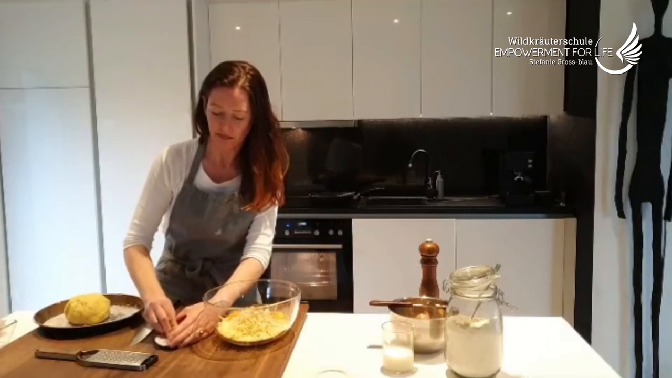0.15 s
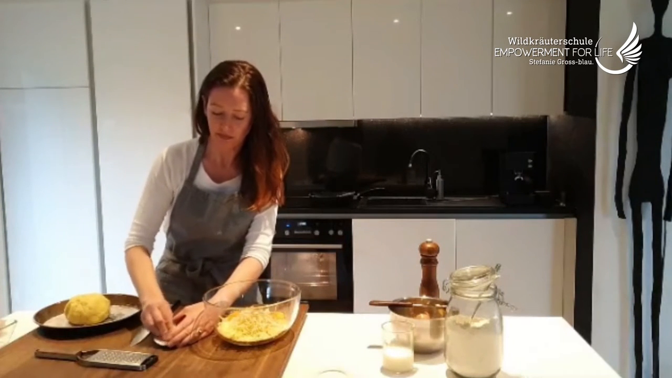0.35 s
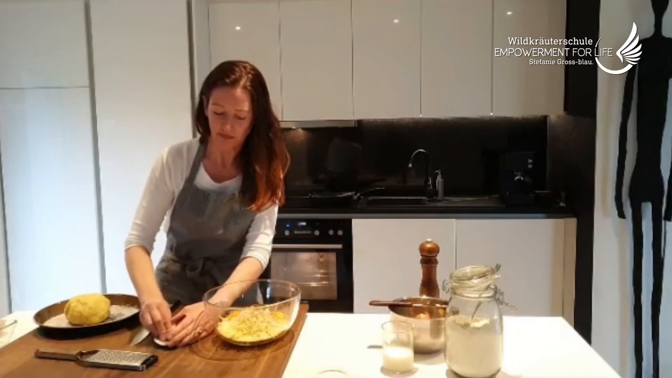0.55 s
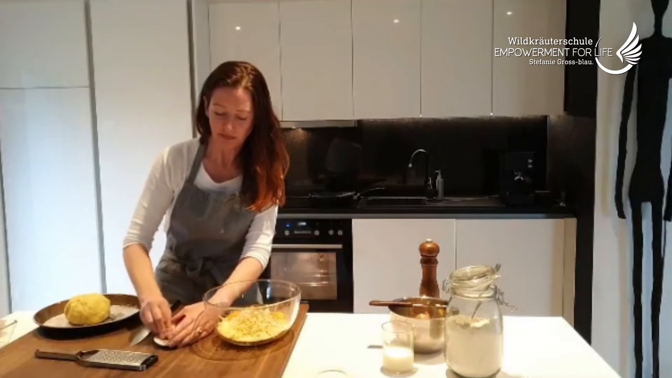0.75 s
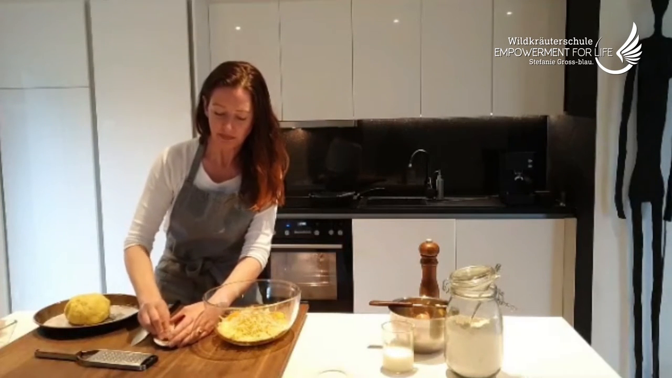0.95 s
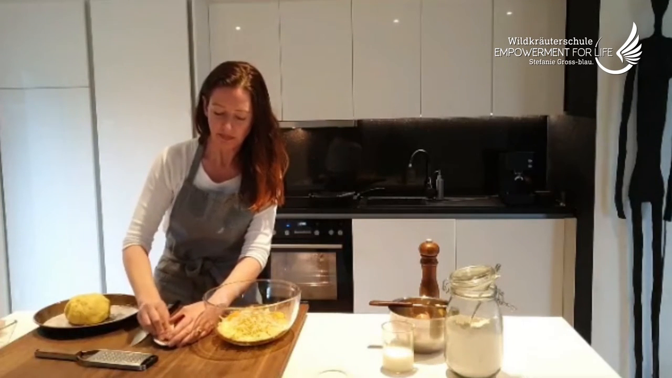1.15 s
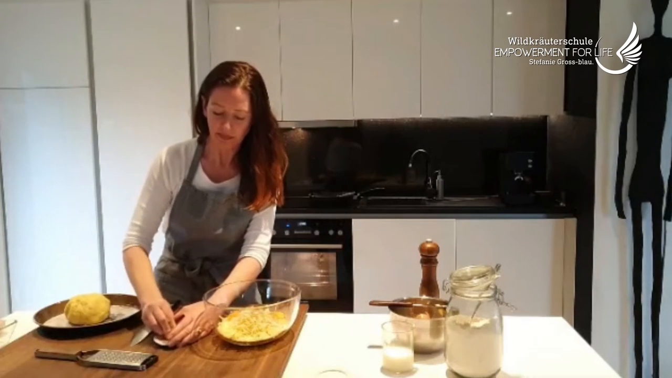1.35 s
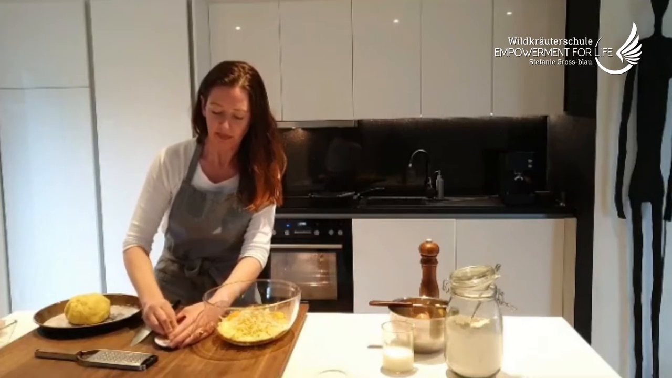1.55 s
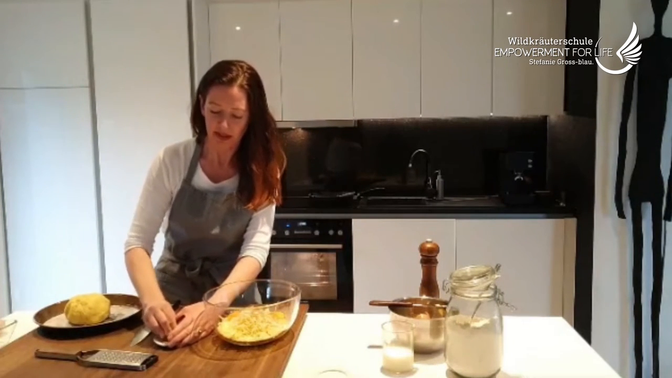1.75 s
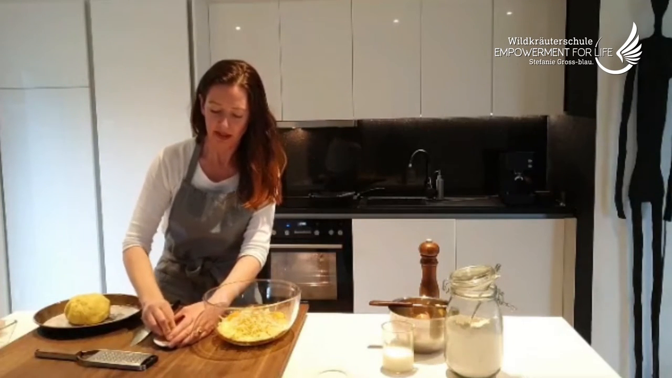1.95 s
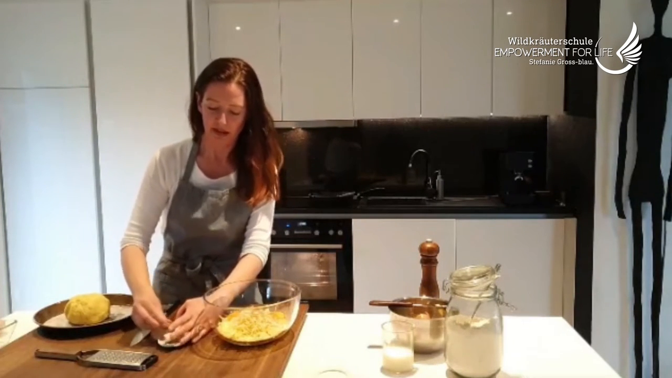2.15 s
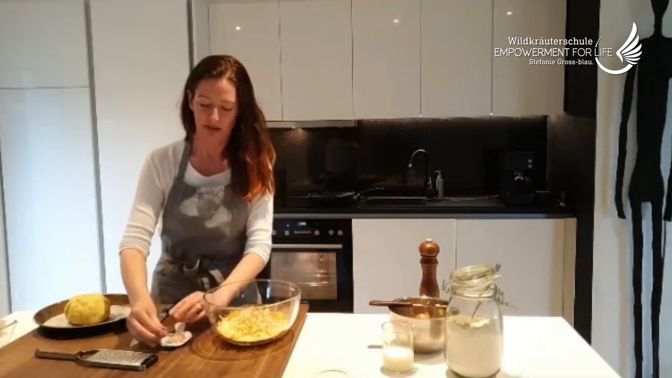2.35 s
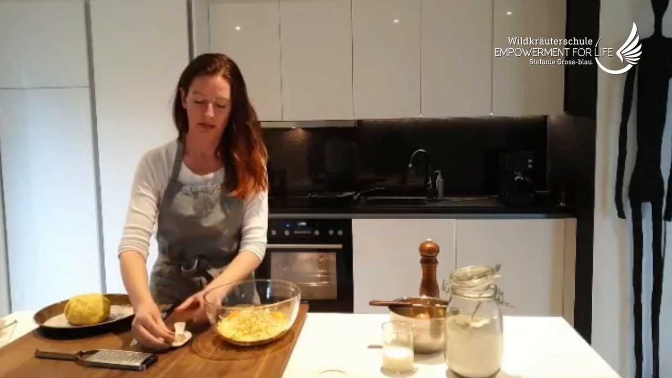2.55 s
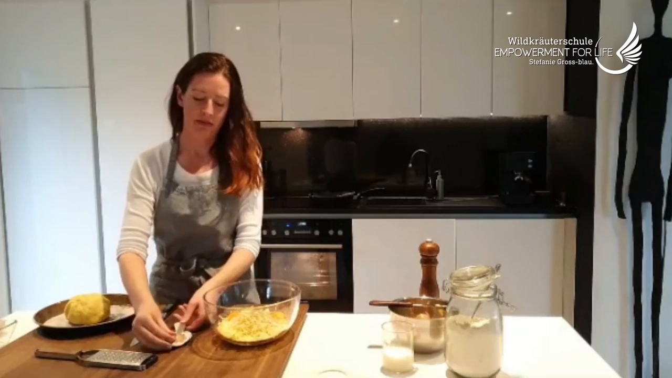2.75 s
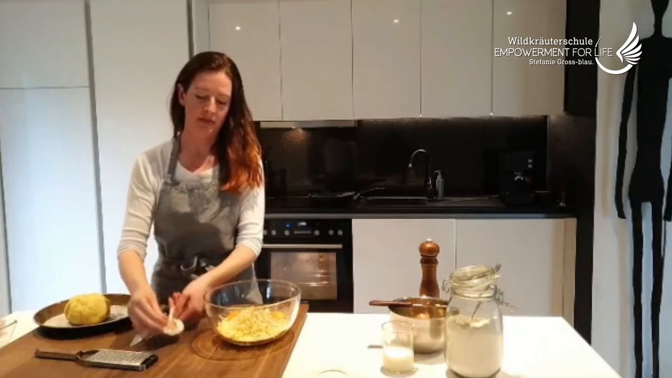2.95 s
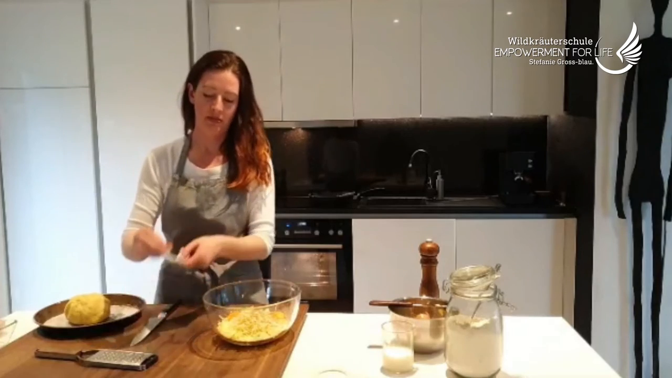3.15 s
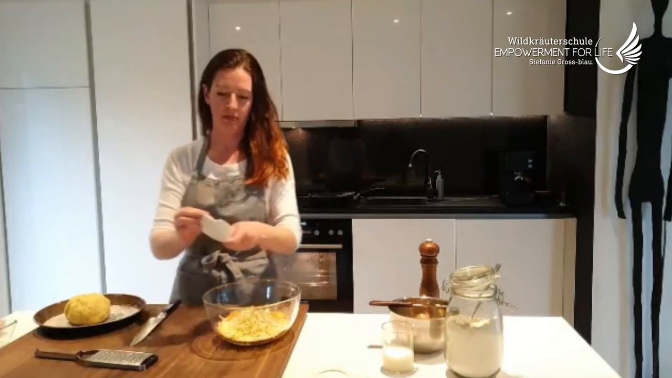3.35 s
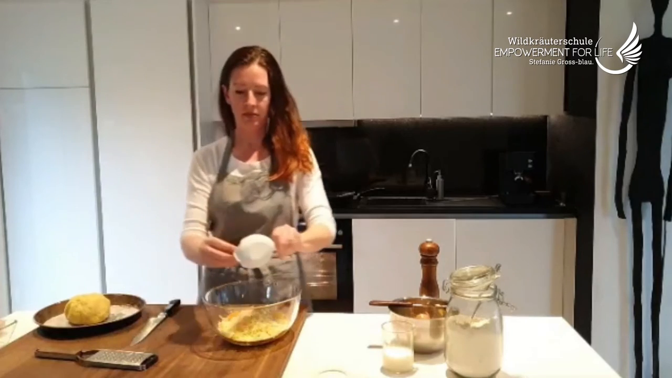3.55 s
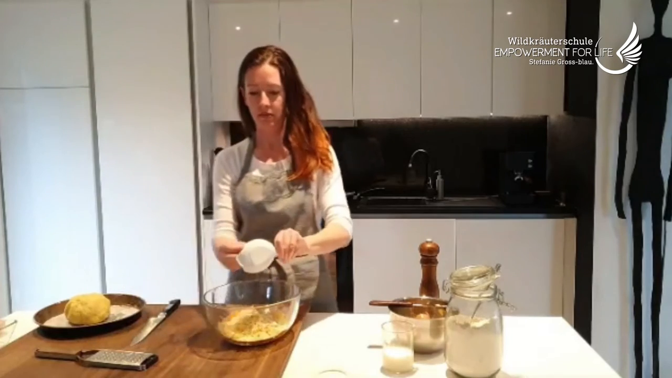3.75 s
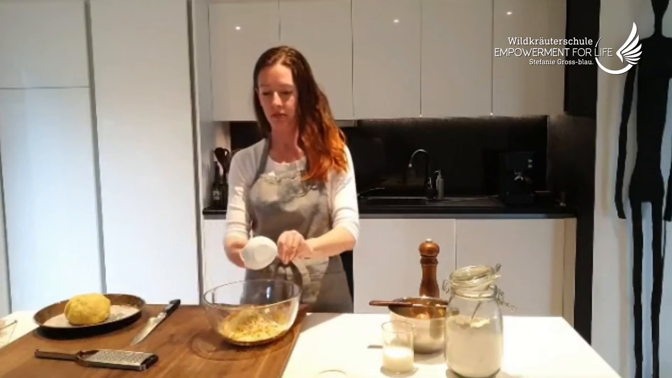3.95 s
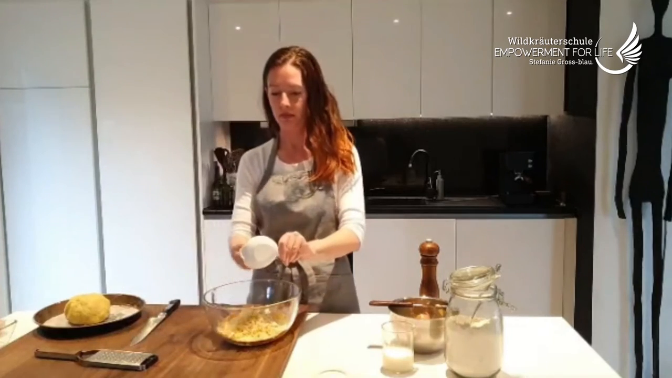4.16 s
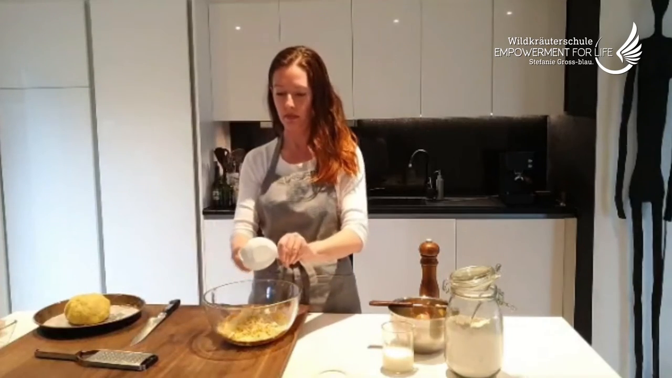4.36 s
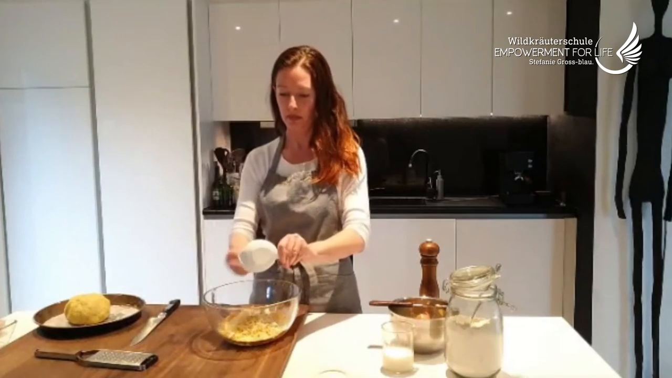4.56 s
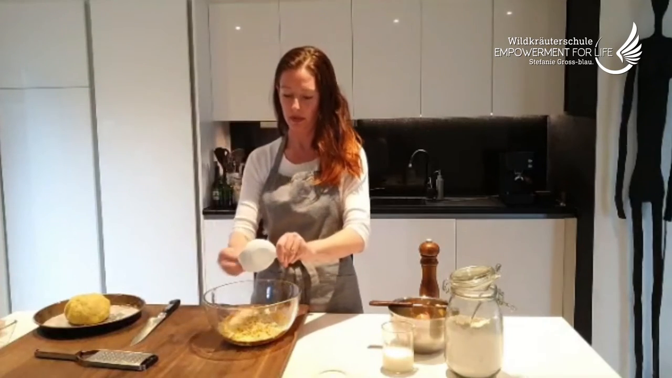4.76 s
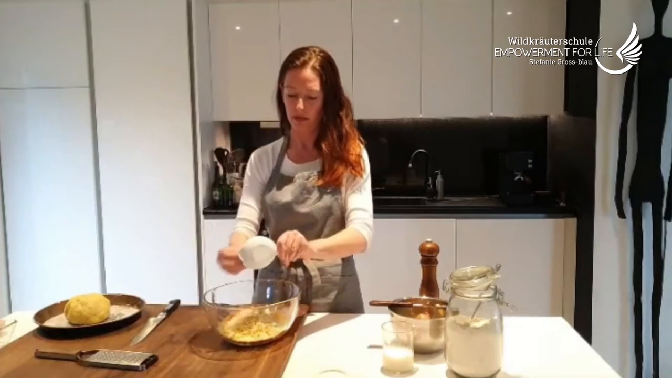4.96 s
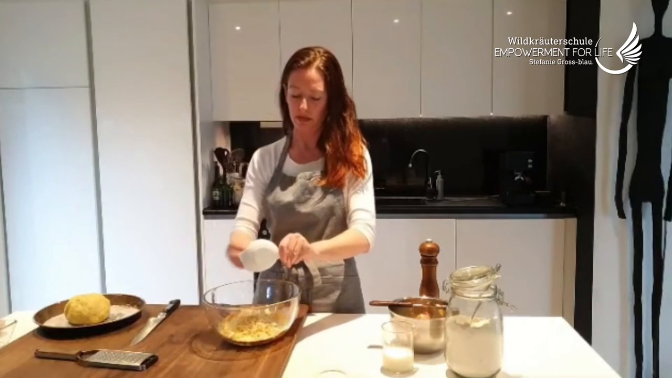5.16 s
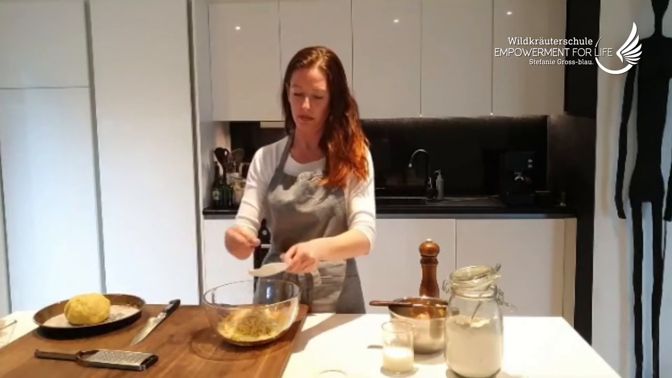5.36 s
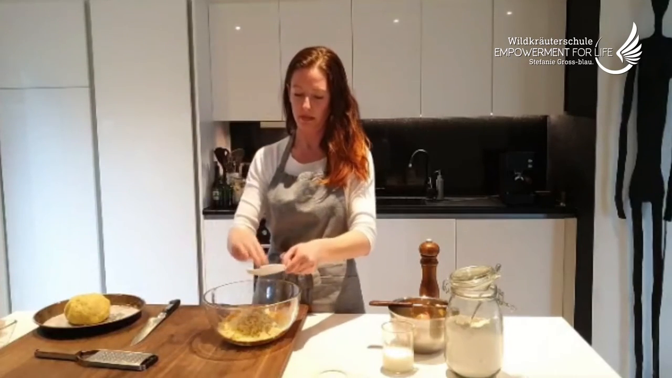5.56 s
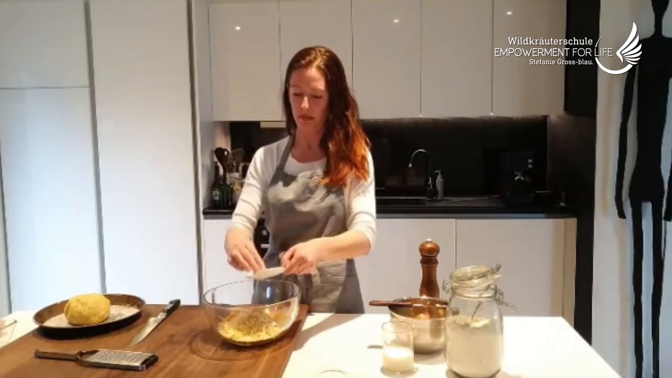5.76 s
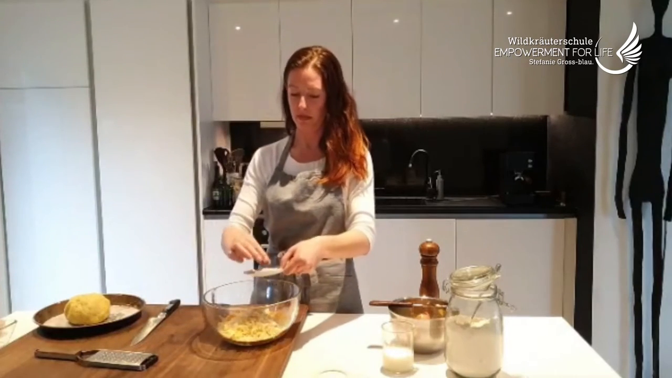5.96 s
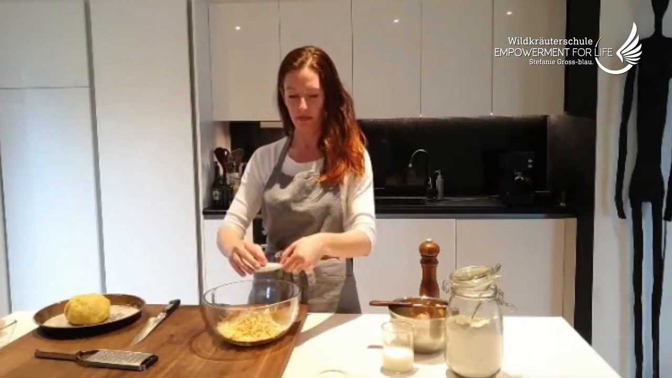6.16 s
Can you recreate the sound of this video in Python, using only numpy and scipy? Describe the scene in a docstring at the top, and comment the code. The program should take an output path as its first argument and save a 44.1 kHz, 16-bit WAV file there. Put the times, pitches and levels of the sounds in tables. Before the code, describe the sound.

A nutmeg is rasped quickly to and fro on a small metal grater pressed against a wooden board, with hollow knocks and crunches. The grater clatters as it is picked up. After a short pause the rasping resumes in the hand, lighter and brighter with a high metallic ring, and a few light taps follow. Hard kitchen walls echo the work, and an appliance hums low underneath.

```python
"""Grating nutmeg in a kitchen

A nutmeg is rasped to and fro on a small grater, about ten strokes a second, each a run of tiny snaps.
First the grater is pressed on a wooden board, which booms; it clatters as it is picked up.
Then it is rasped in the hand, where it rings freely, and tapped clean over a bowl.
Hard kitchen walls echo the work, and an appliance hums."""
import sys
import numpy as np
from scipy import signal
from scipy.fft import rfft, irfft, next_fast_len
from scipy.io import wavfile
from scipy.ndimage import uniform_filter1d

SR = 44100
rng = np.random.default_rng(int(sys.argv[2]) if len(sys.argv) > 2 else 0)


def store_pcm(level_fs):
    """Save levels as 16-bit WAV."""
    pcm = np.round(np.clip(level_fs, -1, 1) * 32767).astype(np.int16)
    wavfile.write(sys.argv[1], SR, np.atleast_2d(pcm).T)


N = 273949

# tone of the grater on the board and in the hand: (frequency [Hz], level [dB])
BOARD_COLOUR = [(28, -26), (45, 2), (70, -1), (140, 3.5), (200, 1.5), (360, -1), (430, -16), (560, 1.5),
                (780, -6), (1050, 3.5), (1800, -4), (2800, -7.5), (4000, -19), (6500, -33), (10000, -27.5),
                (11500, -63), (13000, -88)]
HAND_COLOUR = [(90, -12), (180, -13.5), (280, -3.5), (430, -14.5), (620, -10), (1100, -6.5), (1500, 2.5),
               (2100, -1), (2800, -4.5), (4000, -4.5), (5600, -18), (6600, -15), (9800, -13), (12000, -74)]
# the resonances of each: (frequency [Hz], width [Hz], height above the colour [dB])
BOARD_MODES = [(499, 10, 13), (583.7, 24, 13.2), (607, 26, 10), (688, 29, 12.5), (904, 47, 11.3),
               (1033, 23, 5.7), (1140, 11, 1), (1282, 52, 6.6), (1364, 32, 9), (1566, 150, 8.9),
               (1897, 96, 10.6), (2200, 140, 7.3), (3155, 35, 6.2)]
HAND_MODES = [(613, 90, 7.4), (1545, 130, 2.3), (2592, 46, 11.4), (2760, 430, 10.4), (2830, 18, 14.7),
              (2910, 44, 8), (3150, 85, 7.4), (3690, 22, 4), (4100, 280, 1.8), (5140, 170, 6.8)]
# the grater's high ring and topmost sparkle: (frequency [Hz], width [Hz], level [dB])
RING_MODES = [(8482, 32, 0), (8690, 260, -11), (9620, 220, -20)]
SPARKLE_MODES = [(13775, 42, 0), (14420, 120, -14)]


def board_strokes(boom_hz=600, pressure_shift=.013):
    """Rasping on the board: the hand's pressure retunes the booming wood from stroke to stroke."""
    # (start [s], rise [s], level [dB], boom [dB], brightness [dB/octave])
    strokes = [ (0.0, 0.00073, -16, -4.5, 0.7), (.045, 0.03, -16, -3.5, 0.5),
               (.26, 0.012, -22.5, 2.5, -1.5), (.352, 0.036, -14.5, -1.5, -0.4), (.458, 0.043, -13, 1, 1),
               (.562, 0.04, -15.5, -3.5, 0.4), (.658, 0.021, -14, -0.5, -0.5), (.765, 0.029, -12, 2.5, 0.5),
               (.852, 0.038, -14, 2, 0.5), (.968, 0.027, -12, -5.5, 0), (1.062, .036, -13, -1.5, 0.5),
               (1.166, 0.037, -11, -0.5, -0.5), (1.26, .04, -14.5, 2, 0.5), (1.378, 0.033, -14.5, 1, 0.2),
               (1.475, .023, -15.5, 2, -0.1), (1.765, .018, -16, 5, -0.7), (1.87, 0.028, -14.5, -3, -0.5),
               (1.976, 0.015, -18.5, -7.5, -1.5)]
    # pull, then push: (length [s], ring against the stroke [dB])
    turns = [(.057, -36), (.052, -27.5)]
    out, ringing = np.zeros(N), ring(RING_MODES, damping_hz=464)
    for k, (s, rise, db, boom_db, bright_db) in enumerate(strokes):
        length, ring_db = turns[k % 2]
        push = swing(rise, length, swell=.62, fade=1.19)
        lumpy_push = catching(push, depth_db=2, grip_s=.011)
        force = scrape(lumpy_push, teeth_per_s=900, spread_db=1.5, powder_db=-6.5)
        shift = 1 + pressure_shift * rng.uniform(-.9, 1)
        pressed = body(BOARD_COLOUR, [(hz * shift, width, peak) for hz, width, peak in BOARD_MODES])
        booming = lift(pressed, boom_db, boom_hz, octaves=.19)
        rasp = bite(force, booming, bright_db) + amp(ring_db) * bite(force, ringing, 0)
        add(out, s, amp(db) * np.linalg.norm(push) * rasp)
    return out


def hand_strokes(hurry_per_s=.3, touch_shift=.025, touch_db=4, plate_hz=2760):
    """Rasping in the hand: each stroke meets another spot of the plate, bending and favouring modes."""
    # (start [s], rise [s], level [dB], brightness [dB/octave], lift of the main resonance [dB])
    strokes = [ (3.874, 0.033, -27, -0.1, 4), (3.975, 0.013, -33, -0.5, -1), (4.045, 0.0071, -29, 2.5, 0),
               (4.117, 0.023, -26.5, -1.5, 5.5), (4.232, 0.016, -25.5, -0.7, 6),
               (4.298, 0.02, -30, -2.5, 5), (4.391, 0.021, -24, -1.5, 0), (4.47, .025, -29.5, -2, 4),
               (4.565, 0.012, -25, -1, -3), (4.644, 0.012, -22, -0.2, 1), (4.742, 0.02, -27, -2.5, -3),
               (4.818, .018, -27.5, -1.5, -2), (4.906, 0.0082, -23.5, -1.5, -1),
               (4.992, 0.025, -25, 0.7, -4), (5.089, 0.0077, -22.5, -1.9, -4.5), (5.172, 0.017, -28, 2, -2),
               (5.253, 0.011, -29.5, -1.7, 7)]
    # pull, then push, before hurry shortens them: (length [s])
    turns = [.05, .06]
    out = np.zeros(N)
    for k, (s, rise, db, bright_db, plate_db) in enumerate(strokes):
        length = turns[k % 2] * np.exp(-hurry_per_s * (s - strokes[0][0]))
        push = swing(rise, length, swell=.56, fade=2.1)
        lumpy_push = catching(push, depth_db=3, grip_s=.008)
        force = scrape(lumpy_push, teeth_per_s=300, spread_db=2.6, powder_db=-13)
        shift = 1 + touch_shift * rng.uniform(-1.08, 1)
        modes = [(hz * shift, width, peak + touch_db * rng.uniform(-.8, 1))
                 for hz, width, peak in HAND_MODES]
        plate = lift(body(HAND_COLOUR, modes), plate_db, plate_hz, octaves=.18)
        add(out, s, amp(db) * np.linalg.norm(push) * bite(force, plate, bright_db))
    return out


def swing(rise, length, swell, fade):
    """The push of one stroke swells, then fades; swell and fade set the two curves."""
    t = np.arange(SR // 3) / SR
    attack = np.minimum(t / max(rise, .001), 1) ** swell
    return attack * np.exp(-(np.maximum(t - rise, 0) / max(length - rise, .004)) ** fade)


def catching(push, depth_db, grip_s):
    """The nut grips and slips at random, so a push comes in lumps."""
    t = np.arange(len(push)) / SR
    grip = np.interp(t / grip_s, np.arange(64), rng.uniform(-1, 1, 64))
    return push * amp(depth_db * grip)


def scrape(push, teeth_per_s, spread_db, powder_db, jitter=.35):
    """Force of the teeth chipping the nut: a loosely even run of uneven snaps over a fine hiss."""
    hiss = unit(rng.standard_normal(len(push)))
    gap, size, sign = rng.random((len(push) // 8, 3)).T
    teeth_passed = np.cumsum(teeth_per_s / SR * (.5 + .5 * push))  # a faster nut passes more teeth
    onsets = np.searchsorted(teeth_passed, np.cumsum(1 + 2 * jitter * (2 * gap - 1)))
    heights = amp(spread_db * np.minimum(-np.log(1 - size), 3)) * np.sign(sign - .5)
    snaps = np.bincount(onsets, heights, len(push))[:len(push)]
    return unit(push * (unit(snaps) + amp(powder_db) * hiss))


def bite(force, response, bright_db):
    """The force shakes a body; a sharper bite tilts it to the treble by bright_db an octave."""
    tilted = shape(force, lambda f: amp(bright_db * np.log2(np.clip(f, 400, 5500))))
    return unit(signal.fftconvolve(tilted, response)[:len(force) + SR // 5])


def drag(board, until_s=2.24, release_s=.23, db=-35.5):
    """The nut stays on the teeth between strokes, too lightly to wake much of the board's boom."""
    t = np.arange(round(until_s * SR)) / SR
    push = np.clip((until_s - t) / release_s, 0, 1)
    force = scrape(push, teeth_per_s=960, spread_db=-.5, powder_db=-2.5)
    rasp = bite(force, lift(board, db=-8.5, hz=600, octaves=.19), bright_db=3)
    out = np.zeros(N)
    add(out, 0, amp(db) * np.linalg.norm(push) * rasp)
    return out


def bumps():
    """The pressed grater bumps the board in mid-stroke with a hollow knock."""
    # (time [s], energy [dB])
    hits = [(.073, 9), (.598, 3.5), (.674, 13), (.89, 15), (1.097, 6), (1.503, 10.5), (1.812, 7.5)]
    # tone of a bump: (frequency [Hz], level [dB])
    colour = [(40, -18), (200, -14), (430, -18.5), (560, 0), (700, 1), (950, -9), (3000, -30.5),
              (8000, -54), (13000, -75.5)]
    # its hollow resonance: (frequency [Hz], width [Hz], height above the colour [dB])
    modes = [(585.3, 35, 27)]
    out, hollow = np.zeros(N), body(colour, modes)
    for s, db in hits:
        add(out, s, amp(db) * blow(hollow, corner_hz=2400, chatter_s=.012))
    return out


def crunches(board):
    """The nut digs in and a chip breaks off with a pitched crunch."""
    # (time [s], energy [dB], chatter [s], pitch [Hz])
    chips = [(.492, 17, 0.015, 1460), (.985, 9, .012, 1226), (1.193, 6, .006, 1500),
             (1.411, 10, .005, 1440), (1.773, 14.5, 0.019, 1556)]
    # a crunch favours the board's upper resonances: (frequency [Hz], gain [dB])
    emphasis = [(700, -9.5), (1100, -4.5), (2000, 12.5), (3300, -3.5), (6000, -10)]
    out, bright_board = np.zeros(N), equalise(board, emphasis)
    for s, db, chatter_s, hz in chips:
        pitched = lift(bright_board, db=18, hz=hz, octaves=.13)
        add(out, s, amp(db) * blow(pitched, corner_hz=9000, chatter_s=chatter_s))
    return out


def crumbs():
    """Crumbs snap off with tiny bright ticks."""
    # (time [s], energy [dB])
    ticks = [(.287, -30), (.682, -29.5), (.99, -34)]
    out, tick = np.zeros(N), body([(1500, -23), (5000, .5), (10000, -10), (15000, -8)], [])
    for s, db in ticks:
        add(out, s, amp(db) * tick)
    return out


def zings():
    """A tooth sets the held grater's ring and sparkle singing within a stroke."""
    # (time [s], drive [s], energy [dB], sparkle against the ring [dB])
    catches = [(3.887, .004, -14, -1), (3.975, 0.018, -6, -11), (4.051, 0.031, -1.5, -8),
               (4.143, 0.016, -5.5, -8), (4.235, .002, -10, -8), (4.244, .014, -2.5, -11),
               (4.31, 0.017, -11, -9), (4.407, .008, -5.5, 0), (4.495, 0.011, -16, 0),
               (4.57, 0.028, -10.5, -1), (4.662, 0.037, -2, -4), (4.748, 0.026, -4.5, 3),
               (4.83, 0.045, -2, -6), (4.91, 0.033, 3, -16), (5.011, .016, 6, -14), (5.092, 0.023, 0.5, -6),
               (5.194, .01, -3, -3), (5.254, 0.016, -8, -9)]
    out = np.zeros(N)
    for s, drive_s, db, sparkle_db in catches:
        ringing = zing(RING_MODES, drive_s, damping_hz=30, grit=.4)
        sparkle = zing(SPARKLE_MODES, drive_s, damping_hz=60, grit=.54)
        add(out, s, amp(db) * (ringing + amp(sparkle_db) * sparkle))
    return out


def zing(modes, drive_s, damping_hz, grit, rise_s=.0043):
    """Teeth pump the high modes for a moment; then the nut pressing on the plate mutes them."""
    t = np.arange(SR // 6) / SR
    drive = np.minimum(t / rise_s, 1) * np.exp(-(t / drive_s) ** 4)
    friction = unit(drive * rng.standard_normal(len(t)))
    pumping = unit(drive * np.sin(2 * np.pi * modes[0][0] * t))
    singing = unit(signal.fftconvolve(pumping, ring(modes, damping_hz)))
    scratch = unit(signal.fftconvolve(friction, ring(modes, damping_hz=220)))
    return unit(singing + grit * scratch)


def skids(grater):
    """The nut skids over the tooth tips with a bright scrape."""
    # (time [s], energy [dB])
    slips = [(4.328, -1), (5.178, -0.5)]
    out, tips = np.zeros(N), lift(grater, db=17.5, hz=4550, octaves=.33)
    push = swing(rise=.014, length=.027, swell=.8, fade=2.9)
    for s, db in slips:
        force = scrape(push, teeth_per_s=700, spread_db=4, powder_db=-13)
        add(out, s, amp(db) * bite(force, tips, 0))
    return out


def snags(grater):
    """A tooth snags on the nut and lets go with a click."""
    # (time [s], energy [dB])
    clicks = [(3.8945, -13), (3.913, -1), (3.978, -1), (4.0498, 0.5), (4.0695, -6), (4.1211, 3),
              (4.2328, -2.5), (4.246, -0.5), (4.31, 0.5), (4.408, -9), (4.433, -1.5), (4.569, -4.5),
              (4.653, -2), (4.664, -2), (4.7653, -1), (4.91, -2.5), (5.0895, -2), (5.108, -3),
              (5.2551, -1.5)]
    out = np.zeros(N)
    for s, db in clicks:
        add(out, s, amp(db) * blow(grater, corner_hz=8000, chatter_s=.0015))
    return out


def clatter(wood_hz=1450, halving_db=8.5):
    """The grater is tipped up, clacks down and rocks on the board until it is lifted."""
    # (time [s], energy [dB], treble corner [Hz], woody body [dB])
    knocks = [(2.232, 11.5, 3030, 2), (2.2375, 15, 4450, 7.5), (2.248, 10, 2200, 7), (2.256, 4.5, 2580, 6),
              (2.2856, 16.5, 3640, -4), (2.2955, 15, 898, -0.5), (2.318, 3.5, 2030, 1),
              (2.383, -3, 700, -5), (2.604, -7, 1100, -9), (2.7, -17, 600, 3), (2.872, -20, 400, -4.5),
              (2.95, -19.5, 330, 5), (2.972, -18, 330, -8.5)]
    # tone of the loose grater against the board: (frequency [Hz], level [dB])
    colour = [(100, -25), (250, -19), (440, -19), (600, -0.5), (950, -5.5), (1450, -5.5), (1950, -1),
              (2800, -5.5), (3500, -24), (6500, -35.5), (11000, -50)]
    # its resonances: (frequency [Hz], width [Hz], height above the colour [dB])
    modes = [(614, 38, 9.2), (677, 42, 10.6), (730, 22, 1.4), (1140, 20.5, 1.32), (1298, 21, 11),
             (1393, 38, 12), (1536, 28, 11.5), (2670, 40, 5.9), (3920, 150, 13)]
    out, clack = np.zeros(N), body(colour, modes)
    for s, db, corner_hz, wood_db in knocks:
        struck = lift(clack, wood_db, WOOD_HZ := wood_hz, octaves=.31)
        chatter_s = min(.0069 / 2 ** (db / halving_db), .017)  # harder knocks are shorter
        add(out, s, amp(db) * blow(struck, corner_hz, chatter_s))
    return out


def taps(grater, click_db=-10, sparkle_db=-14):
    """Taps shake off the powder while the grater chatters against the fingers."""
    # (time [s], energy [dB], treble corner [Hz])
    hits = [(5.538, -5.5, 4050), (5.685, -4.5, 9200), (5.858, -10.5, 7250), (6.111, -19, 1390),
            (6.19, -25, 1970)]
    # a fingertip bends the whole plate, so its low modes speak more: (frequency [Hz], gain [dB])
    fingertip = [(300, -9.5), (600, 4), (1000, 4), (1500, -8.5), (2600, -3.5), (4500, -6), (6500, 8)]
    out, tapped = np.zeros(N), equalise(grater, fingertip)
    ringing = ring(RING_MODES) + amp(sparkle_db) * ring(SPARKLE_MODES)
    for s, db, corner_hz in hits:
        ring_db = 26 * np.log2(corner_hz / 9200)  # only a sharp tap reaches the high modes
        add(out, s, amp(db) * blow(tapped, corner_hz, chatter_s=.025))
        add(out, s, amp(db + click_db) * blow(grater, corner_hz, chatter_s=.0032))
        add(out, s, amp(db + ring_db) * ringing)
    return out


def worktop(swell_s=.027):
    """The hands lean on the board and the worktop answers with soft, low thuds."""
    # (time [s], energy [dB], pitch [Hz])
    thuds = [(0.801, 4.5, 146), (1.412, 4, 73.3), (1.787, 7.5, 139.3), (1.813, 11.5, 71.5),
             (1.989, 1, 73.9)]
    out, t = np.zeros(N), np.arange(SR // 3) / SR
    for s, db, hz in thuds:
        add(out, s, amp(db) * unit(t * np.exp(-t / swell_s) * np.sin(2 * np.pi * hz * t)))
    return out


def clinks():
    """Something metal, jolted as the grater lands, rings thin and clear."""
    # (time [s], energy [dB])
    jolts = [(2.284, -17), (2.615, -39)]
    # a close, beating pair: (frequency [Hz], level [dB], t60 [s])
    modes = [(5208, 0, .42), (5262, -6, .2)]
    out, t = np.zeros(N), np.arange(SR // 2) / SR
    clink = unit(sum(amp(db) * unit(np.sin(2 * np.pi * hz * t) * amp(-60 * t / t60))
                     for hz, db, t60 in modes))
    for s, db in jolts:
        add(out, s, amp(db) * clink)
    return out


def brush(start_s=3.143, db=-57, fall_s=.14):
    """A finger brushes faintly over the lifted grater."""
    out, t = np.zeros(N), np.arange(SR // 2) / SR
    hiss = equalise(rng.standard_normal(len(t)), [(1200, -23), (3500, -1), (6000, -7.5), (13000, -17)])
    add(out, start_s, amp(db) * hiss / hiss.std() * np.exp(-t / fall_s))
    return out


def kitchen(x, wet_db, gap_s, lag_s, echoes_per_s=4000):
    """Direct sound, a little later on the left, and a dense tail from the hard cupboards."""
    # reverb time: (frequency [Hz], t60 [s])
    decay = [(100, 1), (300, 0.51), (700, 0.6), (1500, 0.63), (3000, 0.58), (6000, 0.62), (8400, 0.35),
             (15000, 0.23)]
    t = np.arange(SR * 3 // 4) / SR
    echoes = rng.choice([-1, 1], (2, len(t))) * (rng.random((2, len(t))) < echoes_per_s / SR)
    hz, age, bands = signal.stft(echoes * (t > gap_s), SR, nperseg=256)
    fading = bands * amp(-60 * age / read(decay, hz)[:, None])
    spectrum = rfft(signal.istft(fading, SR, nperseg=256)[1][:, :len(t)])
    # even out the echoes' energy across the bands
    even = spectrum / np.sqrt(uniform_filter1d(abs(spectrum) ** 2, size=45, axis=1))
    tail = diffuse(unit(irfft(even)[:, :SR * 2 // 3]))
    # the top treble is beamed at the microphone and feeds the room less
    tail = equalise(tail, [(6500, -1), (8500, -8)])
    wet = signal.fftconvolve(x[None], tail, axes=1)[:, :N]
    direct = np.array([shape(x, lambda f: np.exp(-2j * np.pi * f * lag_s)), x])
    return (direct + amp(wet_db) * wet) / np.sqrt(1 + amp(wet_db) ** 2)


def room_tone(waver=.059, pan_db=1.07):
    """A slowly wavering appliance hum, slightly to the left, over faint room noise."""
    # (frequency [Hz], noise density [dB re 1/Hz])
    floor = [(28, -100), (60, -67.5), (100, -82), (150, -92), (220, -89.5), (400, -100), (800, -105),
             (2500, -104), (4000, -101), (6500, -98), (8500, -102), (11000, -107), (14500, -114)]
    # the hum's partials: (frequency [Hz], rms level [dB])
    partials = [(49.3, -38), (98.6, -60), (146, -70.5)]
    t = np.arange(N) / SR
    air = np.sqrt(SR / 2) * diffuse(equalise(rng.standard_normal((2, N)), floor))
    drift = sum(np.sin(2 * np.pi * (hz * t + rng.random())) for hz in np.geomspace(.2, 1.5, 4)) / 2
    hum = sum(amp(db) * np.sqrt(2) * np.sin(2 * np.pi * (hz * t + rng.random())) for hz, db in partials)
    return air + hum * (1 + waver * drift) * amp([[pan_db], [-pan_db]])


def diffuse(two):
    """Makes two unrelated signals alike in the bass, as two close ports hear a diffuse field."""
    # (frequency [Hz], left-right likeness [0..1])
    likeness = [(100, 0.98), (350, 0.82), (650, 0.58), (900, 0.18), (2000, 0), (8000, 0.16)]
    common = shape(two[0], lambda f: read(likeness, f))
    apart = shape(two[1], lambda f: np.sqrt(1 - read(likeness, f) ** 2))
    return np.array([two[0], common + apart])


def body(colour, modes):
    """Impulse response of a body: a broad colour with resonances standing on it."""
    f = np.fft.rfftfreq(32768, 1 / SR)
    peaks = sum((amp(db) ** 2 - 1) / (1 + (2 * (f - hz) / width) ** 2) for hz, width, db in modes)
    cepstrum = irfft(np.log(amp(read(colour, f)) * np.sqrt(np.maximum(1 + peaks, .1))))
    cepstrum[1:len(f) - 1] *= 2  # fold to minimum phase: nothing sounds before the strike
    cepstrum[len(f):] = 0
    return unit(irfft(np.exp(rfft(cepstrum)))[:SR // 4])


def ring(modes, damping_hz=0):
    """The grater's high modes die away; contact with board or nut widens and shortens them."""
    t = np.arange(SR // 3) / SR
    tones = sum(amp(db) * unit(np.exp(-np.pi * (width + damping_hz) * t) * np.sin(2 * np.pi * hz * t))
                for hz, width, db in modes)
    lowpass = signal.butter(8, modes[-1][0] + 700, fs=SR, output="sos")
    return unit(signal.sosfilt(lowpass, tones))


def blow(response, corner_hz, chatter_s):
    """One blow chatters briefly on a body; a softer contact has a lower corner and sounds duller."""
    t = np.arange(SR // 12) / SR
    chatter = unit(rng.standard_normal(len(t)) * np.exp(-t / chatter_s))
    chatter[0] += np.exp(-chatter_s / .0016)  # only a short blow has a clean first strike
    contact = signal.fftconvolve(t * np.exp(-2 * np.pi * corner_hz * t), chatter)
    return unit(signal.fftconvolve(contact, response))


def lift(response, db, hz, octaves):
    """Bell-shaped boost or cut around one pitch."""
    return shape(response, lambda f: amp(db * np.exp(-(np.log2((f + 1) / hz) / octaves) ** 2)))


def equalise(x, curve):
    """Filters by a curve of (frequency [Hz], gain [dB])."""
    return shape(x, lambda f: amp(read(curve, f)))


def shape(x, gain):
    """Filters by a gain given as a function of frequency."""
    size = next_fast_len(x.shape[-1] + 4096)
    return irfft(rfft(x, size) * gain(np.fft.rfftfreq(size, 1 / SR)), size)[..., :x.shape[-1]]


def read(points, hz):
    """Reads a table on a log-frequency axis."""
    f, value = np.transpose(points)
    return np.interp(np.log(hz + 1), np.log(f + 1), value)


def amp(db):
    """Decibels to gain."""
    return 10 ** (np.asarray(db) / 20)


def unit(x):
    """Scales to an energy of one."""
    return x / np.sqrt(np.sum(x ** 2, axis=-1, keepdims=True) + 1e-30)


def add(mix, s, sound):
    """Lays a sound into the mix at s seconds."""
    part = mix[round(s * SR):][:len(sound)]
    part += sound[:len(part)]


def scene():
    """The work in the room; on the left, the board's sound lags a little more than the held grater's."""
    # the two microphone ports hear it differently: (frequency [Hz], left minus right [dB])
    sides = [(60, 1), (150, 0.5), (450, 2.5), (800, 3.5), (2000, 4.5), (4200, 5.5), (6700, 13.5),
             (8400, -6.5), (10500, -10), (13500, 7.5)]
    board, grater = body(BOARD_COLOUR, BOARD_MODES), body(HAND_COLOUR, HAND_MODES)
    on_board = board_strokes() + drag(board) + bumps() + crunches(board) + crumbs()
    work = kitchen(on_board, wet_db=3.5, gap_s=.004746, lag_s=.00009)
    work += kitchen(clatter(), wet_db=2.3, gap_s=.0049, lag_s=.00009)
    in_hand = hand_strokes() + zings() + skids(grater) + snags(grater) + taps(grater) + brush()
    work += kitchen(in_hand, wet_db=2.5, gap_s=.0012, lag_s=.00004)
    work += worktop() + clinks()
    left = shape(work[0], lambda f: amp(read(sides, f) / 2))
    right = shape(work[1], lambda f: amp(-read(sides, f) / 2))
    return np.array([left, right]) + room_tone()


def record(dry, edge_hz=15800):
    """The microphone ports notch the treble, the loudest peaks clip and the very top is cut off."""
    # response of both ports: (frequency [Hz], gain [dB])
    ports = [(6700, 4), (7200, -6), (7600, -17), (8000, -9.5), (8400, 4.5), (14300, -6.5), (15500, -12)]
    clipped = np.clip(equalise(dry, ports), -1, 1)
    lowpass = signal.firwin(511, edge_hz, window=("kaiser", 9), fs=SR)
    return signal.oaconvolve(clipped, lowpass[None], "same")


dry = scene()
out = record(dry)
store_pcm(out)
```